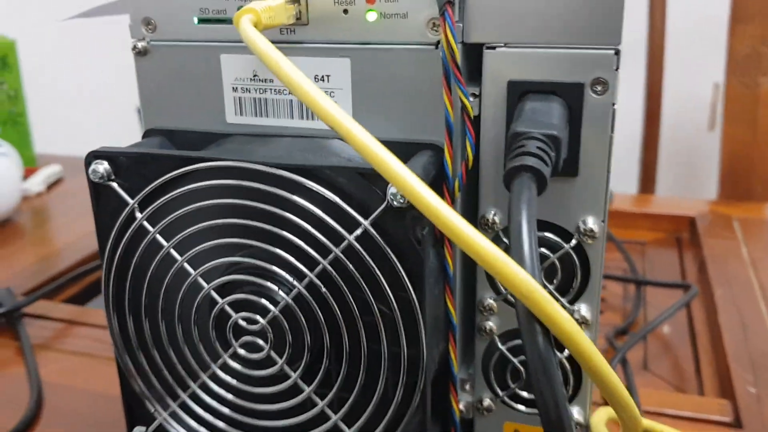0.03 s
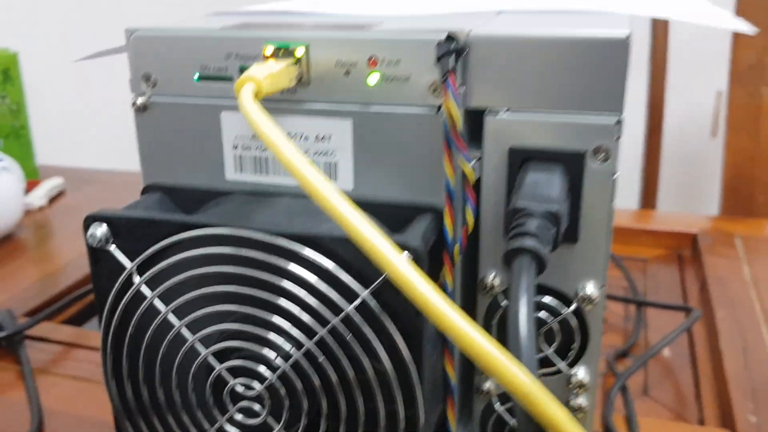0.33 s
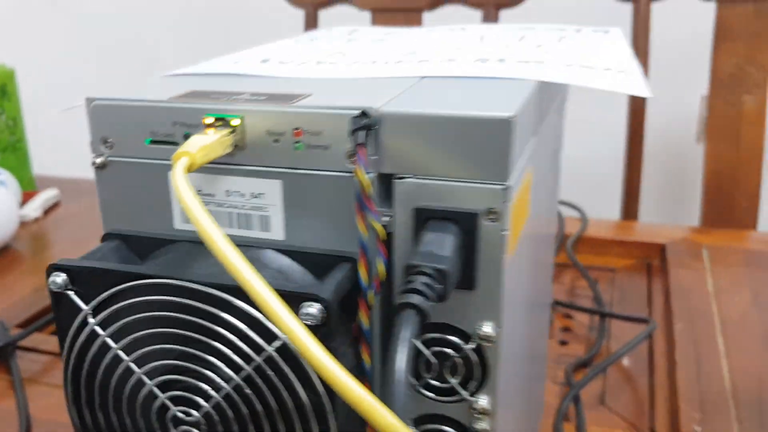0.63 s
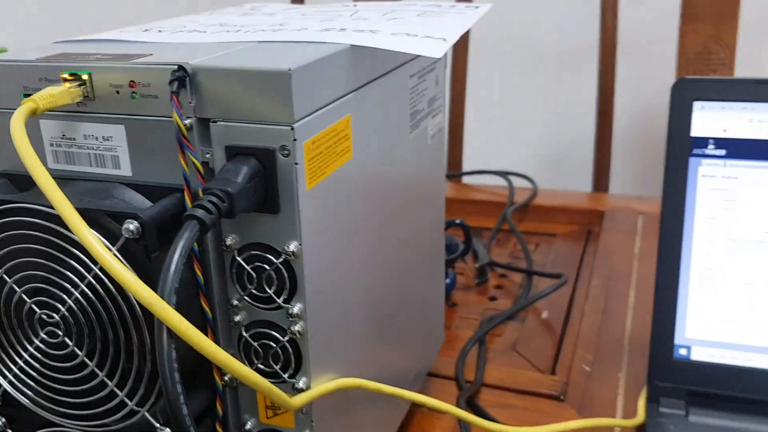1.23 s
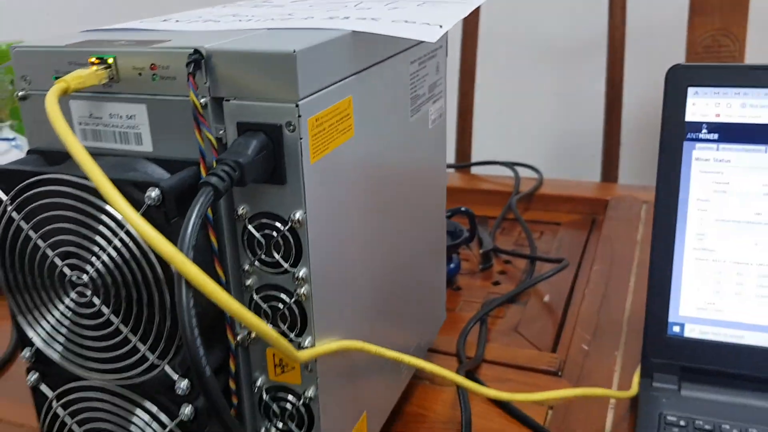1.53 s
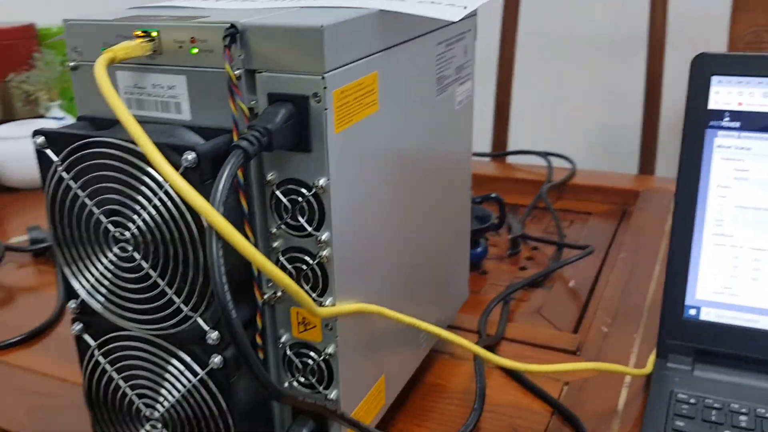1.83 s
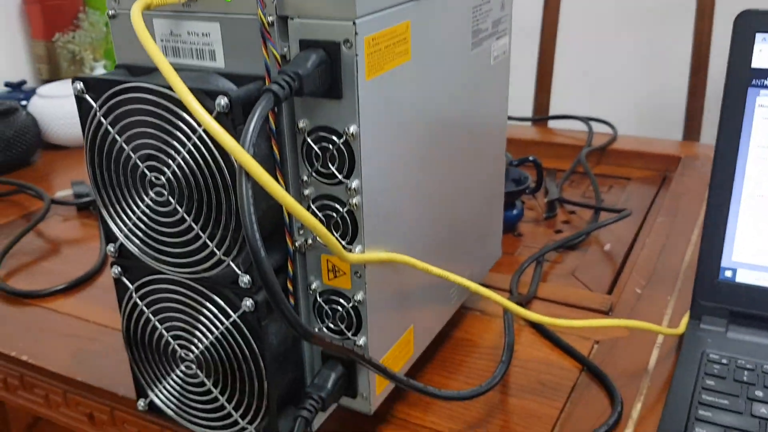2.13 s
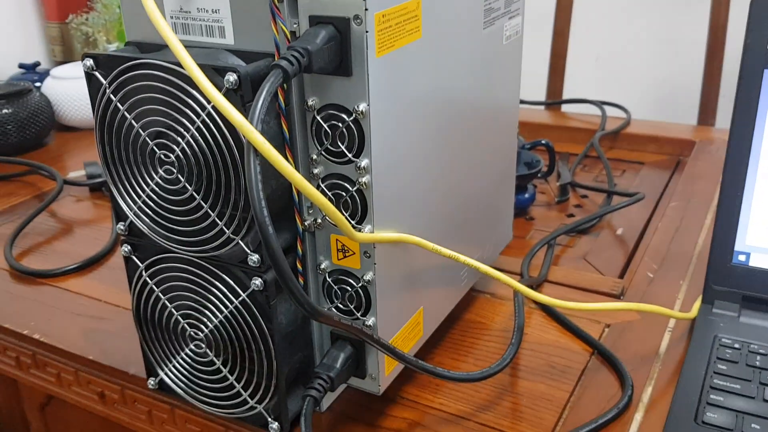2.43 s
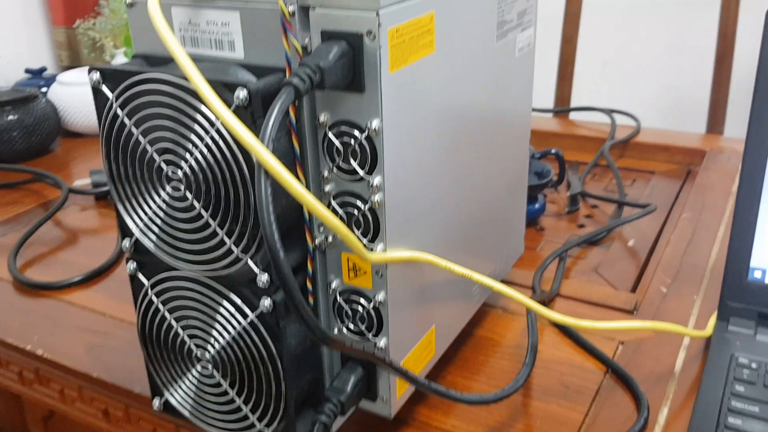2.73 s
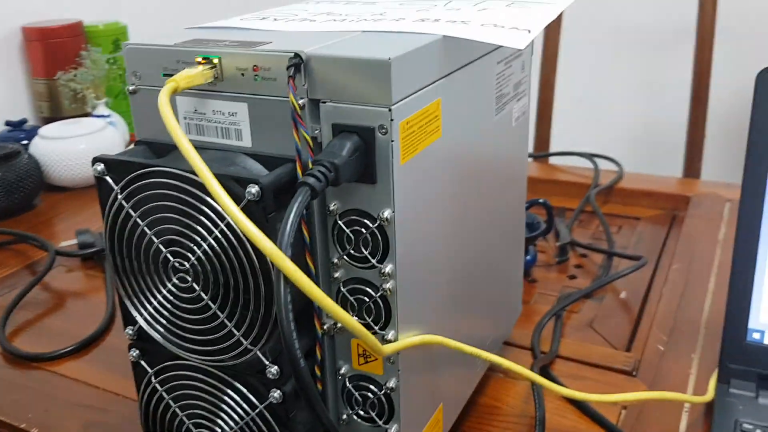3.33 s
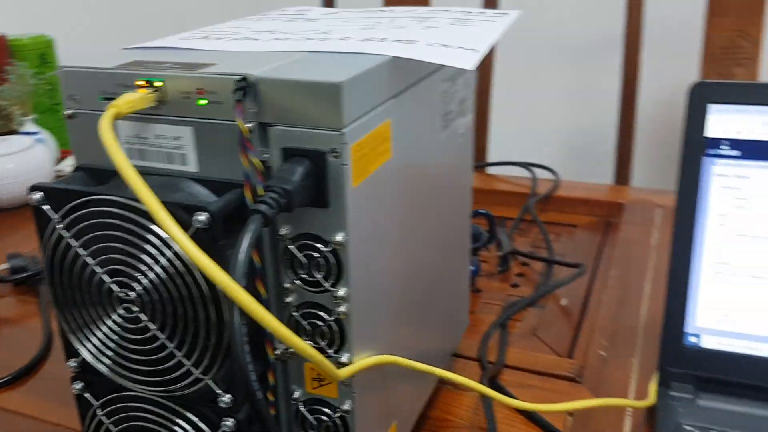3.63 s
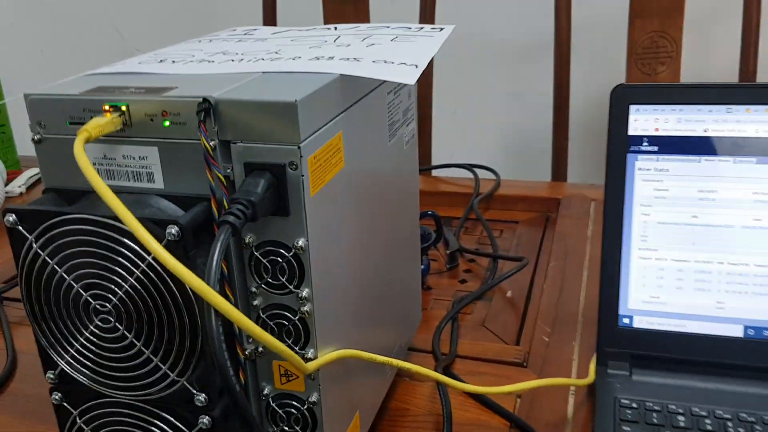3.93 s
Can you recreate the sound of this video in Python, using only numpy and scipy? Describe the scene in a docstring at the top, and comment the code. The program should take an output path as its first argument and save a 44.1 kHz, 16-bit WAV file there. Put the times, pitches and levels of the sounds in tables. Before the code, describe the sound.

Loud cooling fans of a computing machine run at full speed for the whole four seconds, close by in a small room. A steady roar of air carries several high, gently pulsing whines, thin whistles and a lower hum. Pitch barely changes, but single tones swell, fade and shift between left and right as the microphone moves, with a piercing whistle standing out around 0.4, 1.5 and 2.8 seconds.

```python
"""Computer fans at full speed

A computing machine runs flat out on a wooden table in a small room. Two five-bladed front fans turn
at almost the same speed, so their whines beat. The rear fans hum, three small power-supply fans
whistle, and air roars through the case over a faint mains hum. The tones swell and fade as the
microphone drifts through their standing waves."""
import sys
import numpy as np
from scipy import signal
from scipy.fft import rfft, irfft
from scipy.io import wavfile

SR = 44100
rng = np.random.default_rng(int(sys.argv[2]) if len(sys.argv) > 2 else 0)


def bounce(signal):
    """Save signal as a 16-bit WAV file at the path given by the first command-line argument."""
    frames = np.transpose(np.atleast_2d(signal))
    limited = np.clip(frames, -1, 1)
    pcm = np.round(limited * 32767).astype(np.int16)
    wavfile.write(sys.argv[1], SR, pcm)


N = 176400


def from_db(db):
    """Decibels to gain."""
    return 10 ** (np.asarray(db) / 20)


def in_time(rows):
    """Columns of a curve at every sample."""
    s, *columns = np.transpose(rows)
    return np.array([np.interp(np.arange(N) / SR, s, c) for c in columns])


def at_hz(rows, hz):
    """Columns of a spectrum, read on a log-frequency axis."""
    points, *columns = np.transpose(rows)
    return np.array([np.interp(np.log(hz + 1e-9), np.log(points), c) for c in columns])


def drift(rate_hz):
    """Unit-spread random motion, low-passed at rate_hz."""
    control_hz = 500
    pole = np.exp(-2 * np.pi * rate_hz / control_hz)
    slow = signal.lfilter([1], [1, -2 * pole, pole * pole], rng.standard_normal(6000))[2000:]
    return np.interp(np.arange(N) / SR * control_hz, np.arange(len(slow)), slow / slow.std())


def standing_waves(hz, echo_gain=0.43, fades_per_s_per_khz=0.2, shared_below_hz=380):
    """Direct sound plus echoes at moving ears: long waves fade slowly and alike, short fast and apart."""
    rate_hz = fades_per_s_per_khz * hz / 1000
    shared, left, right = (drift(rate_hz) + 1j * drift(rate_hz) for _ in range(3))
    alike = 1 / (1 + (hz / shared_below_hz) ** 2)
    echoes = np.sqrt(alike) * shared + np.sqrt(1 - alike) * np.array([left, right])
    field = 1 + echo_gain * (echoes - echoes.mean(axis=1, keepdims=True))
    return field / np.sqrt(np.mean(abs(field) ** 2, axis=1, keepdims=True))


def swell(rows):
    """Complex gain of a tone along the microphone's path; a single level column serves both ears."""
    columns = in_time(rows)
    left_lead_rad = columns[2:].sum(axis=0)
    return from_db(columns[:2]) * np.exp(1j * left_lead_rad * [[1], [0]])


# Each row: time in seconds, microphone closeness (1 at the grille, 0 backed off to the side).
CLOSENESS = [(0, 1), (.6, 1), (1.2, 0.05), (3.4, 0), (4, 0.36)]

def fan(shaft_hz, tones, swells, flutter_depth, flutter_hz=9.7, wander_share=0.000231, wander_hz=1.5):
    """Shaft harmonics shaken by blade turbulence; their mix shifts as the microphone moves."""
    speed_hz = shaft_hz * (1 + wander_share * drift(wander_hz))
    shaft_rad = 2 * np.pi * np.cumsum(speed_hz) / SR
    closeness = in_time(CLOSENESS)[0]
    out = np.zeros((2, N))
    for harmonic, left_db, right_db, lead_rad, close_db in tones:
        hz = harmonic * speed_hz.mean()
        room = swell(swells[harmonic]) if harmonic in swells else standing_waves(hz)
        flutter = 1 + flutter_depth * (drift(flutter_hz) + 1j * drift(flutter_hz))
        phase_rad = harmonic * shaft_rad + rng.uniform(0, 2 * np.pi)
        tone = from_db(close_db * closeness) * flutter * np.exp(1j * phase_rad)
        left, right = from_db([[left_db], [right_db]]) * room * tone
        centring = 0.83 * closeness * (hz < 1200)  # head-on, long waves reach both ears nearly in step
        out += np.sqrt(2) * np.real([left * np.exp(1j * lead_rad * (1 - centring)), right])
    return out


# Each row: shaft harmonic, left and right level in dB, left lead in rad, change when close in dB.
UPPER_TONES = [(5, -43, -42, 1.1, -2), (8, -54, -47, 1.6, -2), (10, -49, -41, 1.4, -1),
               (15, -43.5, -37, 0.7, -2), (20, -34, -34, 2.9, -1), (25, -38, -34, 0.7, 0),
               (30, -39, -37.5, -0.1, -2), (35, -44, -41, 1.7, -1), (40, -45, -40, -2.5, -6),
               (45, -46, -42, 0, 0), (50, -48, -43, -2.1, -2), (55, -56, -44, 1.4, -3)]
LOWER_TONES = [(1, -58, -57, -0.1, -4), (4, -49, -46, -0.1, -9), (5, -44, -40, -1.7, 0),
               (8, -48, -63, 1.5, 2), (10, -34, -39, 2.6, -4), (12, -51, -44, -2.7, -14),
               (15, -44, -52, 2.1, 0), (20, -31, -27, -2.2, 0), (25, -33, -31, 1.1, 0),
               (30, -38, -35, -1.1, 0), (35, -47, -45, 1.5, 5), (40, -46, -39, -2.2, 1),
               (45, -51, -39, 2.4, 0), (50, -44, -40, -0.9, 2), (60, -53, -47, 2.2, -1)]
# Swells of single tones. Each row: time in seconds, left and right gain in dB.
LOW_WHINE_LEVEL = [(0, -4.5, -3.5), (.25, -6, -6), (.65, 3, -5), (.87, 7.5, 0), (1.12, -13, 3.5),
                   (1.35, -3, 3.5), (2.2, 3, 0.5), (2.8, -2, 3), (4, -3, -1.5)]
HIGH_WHINE_LEVEL = [(0, 1, -32), (0.5, -38, -2), (0.9, 1, -2), (1.2, 3, -8), (1.85, 3, 4), (2.3, -2.5, 5.5),
                    (3.1, 2.5, -7.5), (3.6, 5.5, -7), (4, 2, 4)]
BEATING_WHINE_LEVEL = [(0, -22, -14), (0.4, -18, -2), (0.7, 3, -5), (1.1, 0, -2), (1.7, -7, -4),
                       (2.3, 0.5, -3), (3.2, -9, -2.5), (3.8, 1, 6.5), (4, -3, 7.5)]
# Each row: time in seconds, left and right gain in dB, extra left lead in rad.
MELLOW_WHINE_LEVEL = [(.45, 8, 1, 3), (.8, -21, 1.5, 1), (2, 0, 1.5, 0.5), (2.9, 4, 4, 1), (4, -8, -4.5, 0)]
UNDER_WHINE_LEVEL = [(0, 1, -3.5, -2), (.8, -1, -1, -1.3), (1.2, -4, -2.5, -1), (3, 0.5, 2.5, 0.4),
                     (4, 1, 1, 0.1)]
# Each row: time in seconds, gain at both ears in dB.
DRONE_LEVEL = [(0, -2), (.8, 1), (1.2, -1), (4, 1.5)]
TOP_WHINE_LEVEL = [(.4, 6), (.8, -6.5), (1.1, -0.5), (1.5, 3), (2, -1), (2.6, 2.5), (3.5, -13)]
KEEN_WHINE_LEVEL = [(.3, 6), (1, -5), (1.8, 3), (2.7, 3.5), (3.15, 0), (3.9, 3.5)]
THIN_WHINE_LEVEL = [(0, 3), (.5, -3), (1, 1.5), (2.4, -2), (3.6, -10), (3.85, 7.5), (4, 1)]
WHISTLE_CLUSTER_LEVEL = [(0, -1.4), (.75, 0.43), (1, -1), (2.2, -3.1), (3.5, 0.34), (4, -1)]
# Each entry: shaft harmonic, its swell.
UPPER_SWELLS = {15: MELLOW_WHINE_LEVEL, 20: UNDER_WHINE_LEVEL, 25: BEATING_WHINE_LEVEL, 45:
                THIN_WHINE_LEVEL}
LOWER_SWELLS = {10: DRONE_LEVEL, 20: LOW_WHINE_LEVEL, 25: HIGH_WHINE_LEVEL, 30: TOP_WHINE_LEVEL, 40:
                KEEN_WHINE_LEVEL, 50: WHISTLE_CLUSTER_LEVEL}

def front_fans(upper_shaft_hz=90.3, lower_shaft_hz=91.68):
    """Two five-bladed fans at nearly equal speed, so their whines beat."""
    upper = fan(upper_shaft_hz, UPPER_TONES, UPPER_SWELLS, flutter_depth=0.072)
    lower = fan(lower_shaft_hz, LOWER_TONES, LOWER_SWELLS, flutter_depth=0.072)
    return from_db(1) * upper + from_db(-0.5) * lower


# Each row: shaft harmonic, left and right level in dB, left lead in rad, change when close in dB.
REAR_TONES = [(1, -54, -55, 0, 0), (5, -30, -35, 1.6, 0), (10, -52, -54, 0.9, 8), (15, -54, -45, -0.3, 0),
              (20, -42, -38, 2.0, -1), (25, -54, -47, -2.3, -4)]
# Each row: time in seconds, shaft speed in Hz.
REAR_SPEED = [(0, 75.3), (1.65, 74.75), (2.35, 75.05), (4, 75.1)]
# Each row: time in seconds, left and right gain in dB. The bass is strongest near the case.
HUM_LEVEL = [(0, -1, -3), (.22, 7, 8), (.55, 0, 0), (.88, 5, 0.5), (1.15, -1, -4), (1.43, -5, -2),
             (1.7, -0.5, 1.5), (1.87, -4, 0.5), (2.05, -0.5, -1), (2.75, -3.5, -2), (3, -1.5, -2.5),
             (3.3, -1.5, -4.5), (3.7, 3, 1.5), (4, 1, 1.5)]
BASS_LEVEL = [(.5, 5, 3.5), (1.3, 0.5, -0.5), (2.2, 1, -4), (3, 2.5, -1.5)]
# Each entry: shaft harmonic, its swell.
REAR_SWELLS = {1: BASS_LEVEL, 5: HUM_LEVEL}

def rear_fans():
    """Slower fans on one shared speed, humming mainly at the fifth shaft harmonic."""
    return from_db(-0.5) * fan(in_time(REAR_SPEED)[0], REAR_TONES, REAR_SWELLS, flutter_depth=0.16)


# Each row: shaft harmonic, left and right level in dB, left lead in rad, change when close in dB.
SUPPLY_TONES = [(1, -51.5, -49.5, .3, 0), (5, -43.5, -42, .5, 0), (8, -55, -53, 0, 0),
                (10, -51, -49, 0, -1), (15, -45.5, -43.5, -.6, 1), (25, -54, -52, 0, -3),
                (35, -59, -58, 0, -2)]
# One list per fan. Each row: time in seconds, shaft speed in Hz.
SUPPLY_SPEEDS = [
    [(.6, 302.1), (1.7, 302.4), (3.1, 303.2), (4, 302.5)],
    [(.8, 304.4), (1.2, 305.2), (2.6, 304.8), (3.4, 305.5)],
    [(1.5, 306.6), (2.2, 307.3), (2.9, 305.3), (3.4, 306.2)],
]
# Each row: time in seconds, left and right gain in dB.
PIERCING_WHISTLE_LEVEL = [(.15, -6, -1), (.42, -1, 12), (.7, -5, 7.5), (1.2, -2, 10), (1.55, 10, 2),
                          (2.15, 0, -1), (2.75, 10, 6), (3.3, -12, -8), (3.85, -4, 8), (4, -3, -2)]
# One entry per fan: shaft harmonic, its swell.
SUPPLY_SWELLS = [{15: PIERCING_WHISTLE_LEVEL}, {15: WHISTLE_CLUSTER_LEVEL}, {15: WHISTLE_CLUSTER_LEVEL}]
# One gain per fan in dB.
SUPPLY_GAINS_DB = [0.5, -0.7, -1.5]

def supply_fans():
    """Three small, fast power-supply fans whose whistles slide past one another."""
    return sum(from_db(gain_db) * fan(in_time(speed)[0], SUPPLY_TONES, swells, flutter_depth=0.34)
               for speed, swells, gain_db in zip(SUPPLY_SPEEDS, SUPPLY_SWELLS, SUPPLY_GAINS_DB))


# Each row: frequency in Hz, left and right noise density in dB per Hz.
ROAR_SPECTRUM = [(20, -88.8, -85), (71, -82, -83), (109, -77, -75), (165, -76.5, -73), (221, -69, -68.5),
                 (240, -72.5, -73.5), (298, -75, -64), (326, -65.5, -69), (367, -72, -56),
                 (458, -62.5, -60), (550, -66.5, -67), (723, -69.5, -65), (930, -62, -63.5),
                 (1490, -65.5, -59.5), (1810, -64, -62), (1810, -60, -66), (2170, -67, -59.5),
                 (3130, -66, -60.5), (4540, -65.5, -63.5), (5350, -69.5, -64), (7300, -72, -69.5),
                 (7560, -71.5, -65), (8000, -69, -71), (10600, -69.5, -72), (10500, -72, -68.5),
                 (13000, -73, -72.5), (15600, -81.5, -75)]
# Each row: frequency in Hz, left-right correlation.
ROAR_CORRELATION = [(160, 0.87), (270, 1), (450, 0.027), (740, 0.67), (1200, -0.052), (2000, -0.44),
                    (3300, -0.075), (12000, -0.0098)]
# Each row: time in seconds, left and right gain in dB.
MIDRANGE_LEVEL = [(0, -1, -2.3), (.9, 0, -2.5), (1.4, -0.3, -1.5), (2.4, -1.5, -1.1), (3.2, -0.8, -1),
                  (4, -0.7, -1.5)]

def air_roar(bass_edge_hz=180, treble_edge_hz=5300, gust_db=0.96, gust_hz=16):
    """Turbulent air coloured by case and room, alike at both ears in the bass and diffuse above."""
    hz = np.arange(N // 2 + 1) * SR / N
    mid, side = rfft(rng.standard_normal((2, N))) * np.sqrt(SR) / 2
    alike = np.clip(at_hz(ROAR_CORRELATION, hz), -1, 1)
    noise = np.sqrt(1 + alike) * mid + np.sqrt(1 - alike) * side * [[1], [-1]]
    air = from_db(at_hz(ROAR_SPECTRUM, hz)) * noise
    bass = 1 / (1 + (hz / bass_edge_hz) ** 6)
    below_treble = 1 / (1 + (hz / treble_edge_hz) ** 6)
    out = irfft(air * (1 - below_treble), N)  # steady hiss
    for band, level in (bass, BASS_LEVEL), (below_treble - bass, MIDRANGE_LEVEL):
        gain_db = in_time(level) + gust_db * drift(gust_hz)
        out += irfft(air * band, N) * from_db(gain_db)
    return out


def mains_hum(hz=100, rms_db=-64.5):
    """Faint, steady hum of the power supply."""
    return from_db(rms_db) * np.sqrt(2) * np.sin(2 * np.pi * hz * np.arange(N) / SR)


def scene():
    """Fans, air and mains hum, all running throughout."""
    return front_fans() + rear_fans() + supply_fans() + air_roar() + mains_hum()


def record(dry):
    """Steep low-pass on the top treble."""
    cutoff_hz = 15800
    return signal.sosfilt(signal.ellip(12, .1, 90, cutoff_hz, fs=SR, output="sos"), dry)


dry = scene()
out = record(dry)
bounce(out)
```